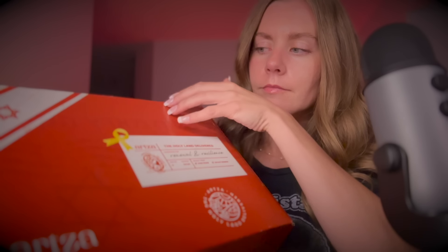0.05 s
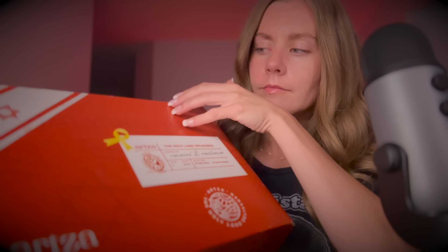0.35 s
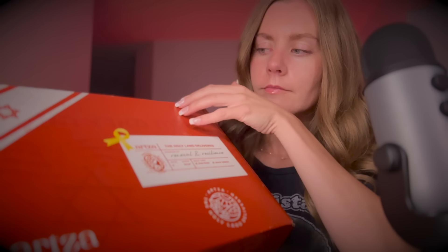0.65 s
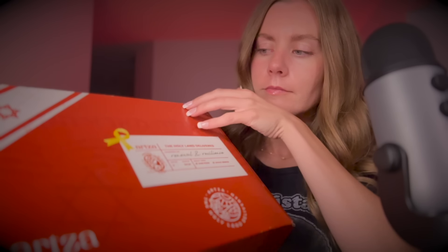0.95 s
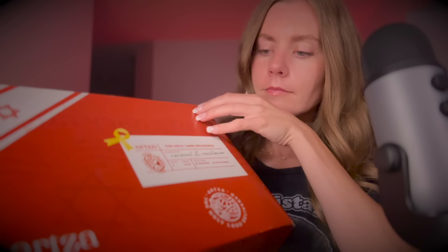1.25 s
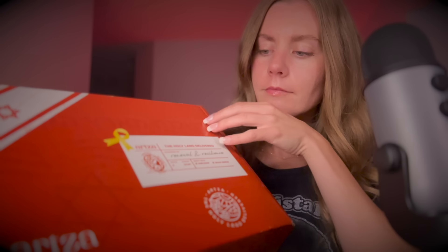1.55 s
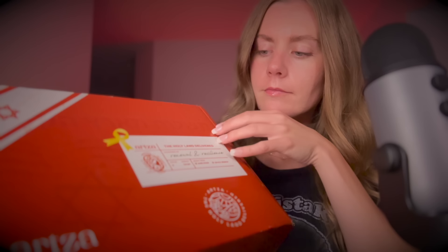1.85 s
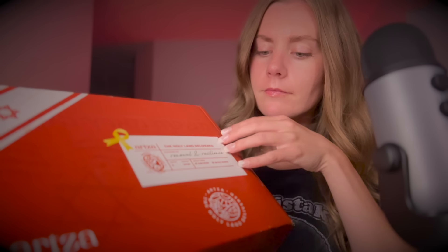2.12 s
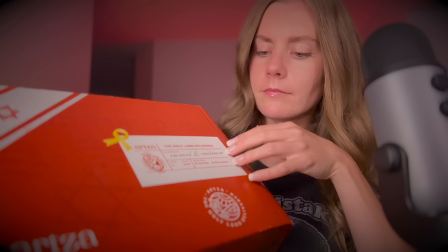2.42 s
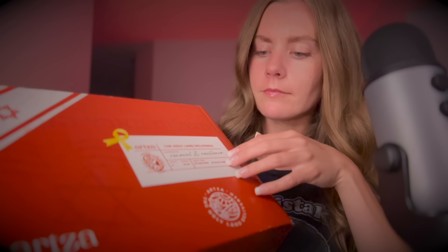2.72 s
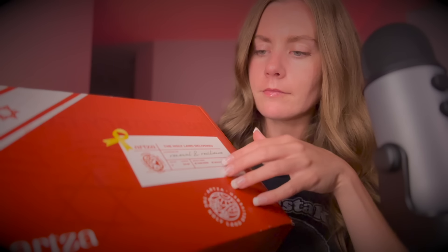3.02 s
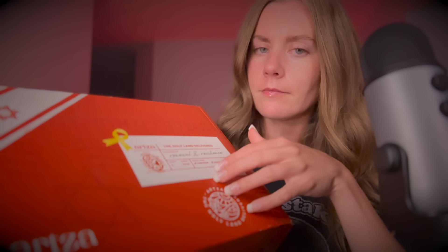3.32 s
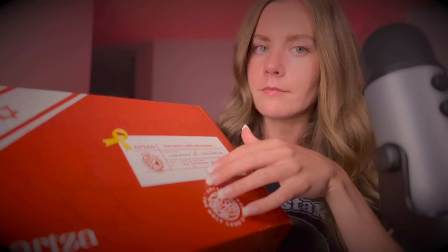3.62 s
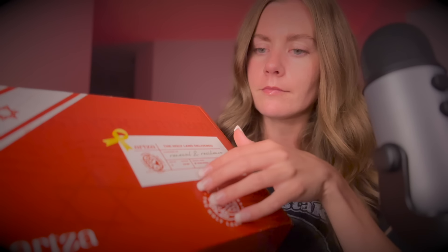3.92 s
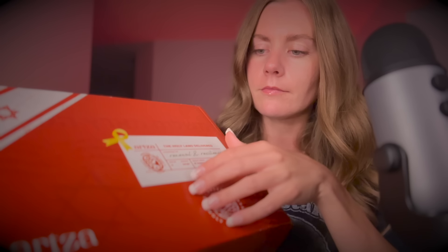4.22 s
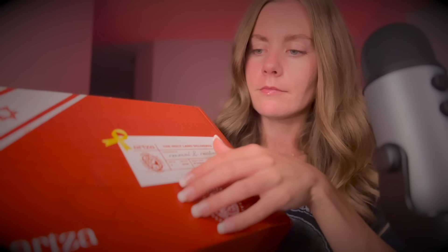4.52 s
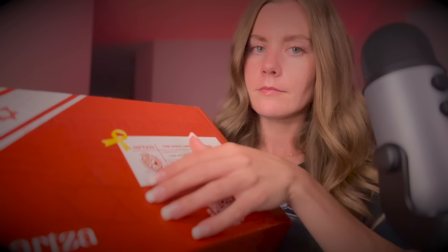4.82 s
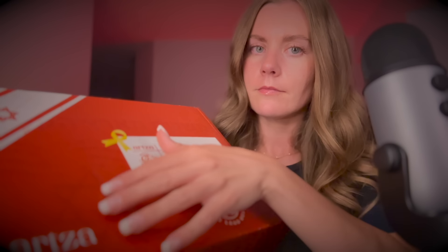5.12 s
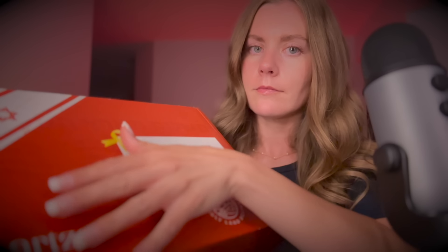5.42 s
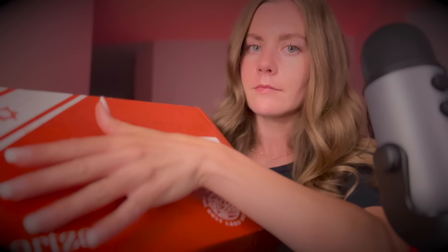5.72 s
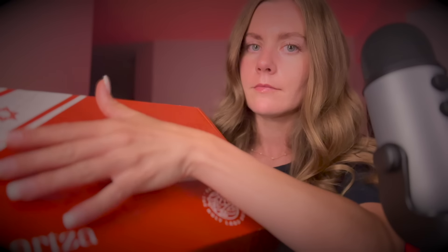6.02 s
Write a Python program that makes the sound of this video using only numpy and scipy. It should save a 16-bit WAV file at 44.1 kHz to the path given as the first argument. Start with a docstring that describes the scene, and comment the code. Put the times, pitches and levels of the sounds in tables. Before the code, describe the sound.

Quick, sharp nail taps and light scratches on a cardboard box in a quiet room, ending in soft rubbing and dull fingertip thumps.

```python
"""In a quiet room, long fingernails tap quickly on a cardboard box beside a microphone.
Each impact excites the box's damped modes, and the nail slides a little after landing, driving them by
stick-slip friction. The fingers work from the stiff edge, which clacks, onto the hollow lid, which
knocks; then the flat hand strokes the lid and soft fingertips bump it. The house drones faintly
underneath, and the hardest taps clip at full scale."""
import sys
import numpy as np
from scipy import signal
from scipy.fft import rfft, irfft, next_fast_len
from scipy.io import wavfile
from scipy.ndimage import map_coordinates

SR = 44100
rng = np.random.default_rng(int(sys.argv[2]) if len(sys.argv) > 2 else 0)


def digitize_waveform(pressure):
    """Quantize a signal to 16-bit integers and store it at the path in sys.argv[1].

    Rows of a 2-D input are taken as channels; values are limited to [-1, 1].
    """
    field = np.atleast_2d(pressure).T
    bounded = np.clip(field, -1, 1)
    quanta = np.round(bounded * 32767).astype(np.int16)
    wavfile.write(sys.argv[1], SR, quanta)


N = 276066
FILTER_SIZE = 8192
FILTER_HZ = np.fft.rfftfreq(FILTER_SIZE, 1 / SR)


def amp(db):
    """Amplitude ratio: tenfold for every 20 dB."""
    return 10 ** (np.asarray(db) / 20)


def unit_rms(x):
    """Normalisation to an rms of 1."""
    return x / np.sqrt(np.mean(x ** 2) + 1e-20)


def curve_at(points, hz):
    """Interpolation of (frequency, value) points on a logarithmic frequency axis."""
    f, values = np.transpose(points)
    return np.interp(np.log(hz + 1), np.log(f + 1), values)


def add(track, s, x):
    """Superposition: x joins the track at s seconds."""
    start = max(round(s * SR), 0)
    part = track[start:start + len(x)]
    part += x[:len(part)]


def wobble(rate, count):
    """Smooth random modulation: a spline through rate random knots a second."""
    knots = rng.standard_normal(int(count * rate / SR) + 4)
    return map_coordinates(knots, [np.arange(count) * rate / SR])


def coloured(x, gain_db):
    """Minimum-phase filtering, with gains given on FILTER_HZ: causality keeps attacks sharp."""
    cepstrum = irfft(np.log(amp(gain_db) + 1e-6))
    cepstrum[1:FILTER_SIZE // 2] *= 2
    cepstrum[FILTER_SIZE // 2 + 1:] = 0
    return signal.fftconvolve(x, irfft(np.exp(rfft(cepstrum))))[:len(x)]


# The room at rest. Each row: frequency in Hz, relative spectral density in dB.
FLOOR_SPECTRUM = [(20, -14), (31, -11), (40, -11), (48, -10), (60, -1.5), (85, -7), (120, -8), (175, -9.5),
                  (300, -16.5), (480, -18), (2500, -30), (6500, -34), (13000, -35), (16000, -38)]
# The drone in the house. Each row: frequency in Hz, rms level in dB about which it wavers.
DRONE_TONES = [(40.2, -46.5), (55, -51.5)]


def background(floor_db=-46, waver_db=4.0, drift_rad=0.55):
    """Noise floor: rumble and microphone hiss, with a house drone modulated in amplitude and phase."""
    hz, t = np.fft.rfftfreq(N, 1 / SR), np.arange(N) / SR
    spectrum = rfft(rng.standard_normal(N)) * amp(curve_at(FLOOR_SPECTRUM, hz))
    out = amp(floor_db) * unit_rms(irfft(spectrum, N))
    for drone_hz, db in DRONE_TONES:
        level = amp(db + waver_db * wobble(3.34, N))
        phase = 2 * np.pi * drone_hz * t + drift_rad * wobble(3.78, N)
        out += level * unit_rms(np.sin(phase))
    return out


# The room's decay. Each row: frequency in Hz, time to fall 60 dB in seconds.
REVERB_TIMES = [(100, 0.52), (500, 0.28), (2000, 0.27), (12000, 0.081)]


def reverberation(x):
    """Absorption in a small furnished room: the diffuse tail decays exponentially, treble first."""
    hz, t, spectra = signal.stft(rng.standard_normal(SR // 2), SR, nperseg=256)
    decay = amp(-60 * t / curve_at(REVERB_TIMES, hz)[:, None])
    tail = signal.istft(spectra * decay, SR, nperseg=256)[1]
    delayed_tail = np.pad(tail / np.linalg.norm(tail), (SR // 150, 0))
    return signal.fftconvolve(x, delayed_tail)[:N]


# The hand's path. Each row: time in seconds, position from 0 (edge) to 1 (lid).
HAND_PATH = [(0, 0.42), (1.3, 0), (2.3, 0.036), (2.6, 0.45), (2.95, 0.7), (3.25, 0.75), (6.26, 1)]


def lid_share(s):
    """Driving point at time s, which decides how strongly each mode is excited."""
    return np.interp(s, *np.transpose(HAND_PATH))


# The hand opens. Each row: time in seconds, pose from 0 (on the nail tips) to 1 (lying flat).
HAND_POSE = [(4.6, 0.016), (5.05, 0.99)]


def flatness(s):
    """Contact geometry at time s: how flat the hand lies."""
    return np.interp(s, *np.transpose(HAND_POSE))


# The box's modes. Each row: frequency in Hz, bandwidth in Hz, relative level in dB when struck at
# the edge, and when struck on the lid.
BOX_MODES = [(59.7, 29, 3, -2.5), (151, 49, -7, -2), (177.5, 50, -6.5, -6), (350, 38, -10.5, -15.5),
             (421.3, 94, -1, 0.5), (488, 70, -4, -2), (584, 68, -2.5, -14.5), (859, 90, -2, -11.5),
             (976, 72, -17.5, -3.5), (1185, 85, 0.5, -9), (1402, 146, -12, -6), (1640, 152, -6.5, -0.5),
             (1844, 115, -8.5, -5), (2170, 100, -8, -14), (2450, 210, -9.5, -16), (3054, 480, -3, -26),
             (3930, 610, -2.5, -4.5), (4500, 1200, -19, -8)]


def box_response(s, spread_db=4.0, scatter_db=-18.0, scatter_t60=0.025):
    """Modal impulse response at the spot touched at time s: all modes start inward together."""
    hz, width, edge_db, lid_db = np.transpose(BOX_MODES)
    level_draw, shift_draw = rng.standard_normal((2, len(BOX_MODES)))
    gain = width * amp(edge_db + lid_share(s) * (lid_db - edge_db) + spread_db * level_draw)
    loaded_hz = hz + width * shift_draw / 5  # the finger's load nudges each mode
    t = np.arange(FILTER_SIZE // 4) / SR
    modes = np.exp(-np.pi * width[:, None] * t) * np.cos(2 * np.pi * loaded_hz[:, None] * t)
    # short bending waves scatter among the flutes of the board
    scatter = signal.lfilter(*signal.butter(1, [1500, 5000], "band", fs=SR), rng.standard_normal(len(t)))
    return -gain @ modes / gain.sum() + amp(scatter_db - 60 * t / scatter_t60) * unit_rms(scatter)


# The nail sings lower as the fingers lean over. Each row: time in seconds, resonance in Hz.
NAIL_PITCH = [(0, 12400), (0.47, 12000), (0.8, 11000), (1.2, 10700), (1.3, 8400), (1.45, 9600), (1.7, 9150),
              (1.83, 7900), (2.0, 11200), (2.55, 11000), (2.87, 8100), (3.9, 8260), (4.3, 9800),
              (4.45, 7900), (4.6, 10200), (4.8, 8900), (6.26, 9500)]
# A long free edge sings lower and more sharply. Each row: resonance in Hz, peak in dB before damping.
NAIL_PEAKS = [(7900, 8.5), (9000, 5), (10300, 3), (13000, 3)]


def nail_resonance_db(s, width_octaves=0.14, dip_db=4, dip_ratio=0.63, flat_damping=0.45):
    """Resonance of the free nail edge: a narrow peak with a dip below, weaker when the hand lies flat."""
    def bell(centre_hz):
        return np.exp(-.5 * (np.log2((FILTER_HZ + 1) / centre_hz) / width_octaves) ** 2)

    hz = np.interp(s, *np.transpose(NAIL_PITCH))
    on_tips = 1 - flat_damping * flatness(s)
    return on_tips * (curve_at(NAIL_PEAKS, hz) * bell(hz) - dip_db * bell(dip_ratio * hz))


# The hollow, board, crack and nail registers. Each row: lower limit in Hz, upper limit in Hz.
REGISTERS = [(100, 650), (850, 2000), (2600, 6000), (7500, 14000)]
CENTRES_HZ = np.sqrt(np.prod(REGISTERS, axis=1))


def register_levels(colours, s, strength_db, tilt_db):
    """Spectral balance in dB: spot and pose set the colour, and the contact tilts it about 1 kHz."""
    lid = lid_share(s)
    shares = [1 - lid, lid, flatness(s)]
    colour_db = np.dot(shares, [colours["edge"], colours["lid"], colours["flat hand"]])
    return strength_db + colour_db + tilt_db * np.log2(CENTRES_HZ / 1000)


def voiced(x, levels_db, seconds):
    """Equalisation for a finger's force and angle: each register's energy / seconds nears its level."""
    size = next_fast_len(len(x))
    hz = np.fft.rfftfreq(size, 1 / SR)
    power = 2 * abs(rfft(x, size)) ** 2 / (size * seconds * SR)
    gains_db = np.zeros(len(REGISTERS))
    for _ in range(3):
        shaped = power * amp(curve_at(np.column_stack([CENTRES_HZ, gains_db]), hz)) ** 2
        band_power = [shaped[(hz > low) & (hz < high)].sum() + 1e-20 for low, high in REGISTERS]
        gains_db = gains_db + levels_db - 10 * np.log10(band_power)
    return coloured(x, curve_at(np.column_stack([CENTRES_HZ, gains_db]), FILTER_HZ))


# The flexing lid and the air under it. Each row: frequency in Hz, relative level in dB, time to
# fall 60 dB in seconds.
LID_MODES = [(56.2, -1.5, 0.25), (147.6, 3.5, 0.14), (192.3, -3.5, 0.12), (236, -5.5, 0.093)]
# Soft pushes on the lid. Each row: start in seconds, peak level in dB.
BUMPS = [(4.775, -37), (4.877, -26.5), (4.987, -18), (5.127, -33), (5.301, -28), (5.55, -24), (5.613, -27),
         (5.789, -24.5), (5.848, -21), (5.93, -30), (6.075, -18), (6.184, -22), (6.224, -21)]


def fingertip_bumps(attack_s=0.0029, detune=0.06):
    """Compliant impact: flesh is too soft to excite the high modes, so only the whole lid flexes."""
    out, t = np.zeros(N), np.arange(SR // 2) / SR
    for s, peak_db in BUMPS:
        thud = sum(amp(db - 60 * t / t60) * np.sin(2 * np.pi * hz * rng.normal(1, detune) * t)
                   for hz, db, t60 in LID_MODES)
        thud *= 1 - np.exp(-t / attack_s)
        add(out, s, -amp(peak_db) * thud / abs(thud).max())
    return out


def moving_contact(force, start, spot_s=0.045):
    """Time-varying convolution: a sliding finger crosses spots that each answer a little differently."""
    spots = np.arange(len(force)) / SR / spot_s
    out = np.zeros(len(force) + FILTER_SIZE // 2)
    for spot in range(int(spots[-1]) + 2):
        near = np.flatnonzero(abs(spots - spot) < 1)
        if len(near):
            crossfade = np.cos(np.pi / 2 * (spots[near] - spot))
            add(out, near[0] / SR, signal.fftconvolve(force[near] * crossfade, box_response(start)))
    return out


# Friction on paper. Each row: frequency in Hz, relative gain in dB.
FRICTION_SPECTRUM = [(30, -29.5), (130, -13.5), (400, -8), (1700, -7), (3000, 1.5), (5000, -0.5), (6700, 0),
                     (9000, 2), (13000, 3.5), (16000, -1)]
# A slide's colour by spot or pose. Each entry: hollow, board, crack and nail weights in dB.
SLIDE_COLOURS = {"edge": (1, 0.5, -9, -8), "lid": (11.5, -0.5, -15.5, -21),
                 "flat hand": (-13, 2, 16.5, 23.5)}
# A nail or the hand slides. Each row: start in seconds, end in seconds, relative strength in dB,
# lightness as treble tilt in dB per octave.
SLIDE_STROKES = [(0.0, 0.076, -45.5, 0.5), (0.226, 0.375, -49.5, -0.3), (0.467, 0.57, -45.5, -0.8),
                 (0.578, 0.675, -43, 0), (0.781, 0.865, -44, 0.5), (0.863, 0.95, -44, 2),
                 (1.035, 1.113, -46.5, 0.2), (1.116, 1.158, -40, 1), (1.165, 1.221, -38.5, 1.5),
                 (1.222, 1.261, -46.5, 2), (1.28, 1.44, -42, 0.2), (1.439, 1.548, -40.5, 1.7),
                 (1.563, 1.642, -54, 2.9), (1.673, 1.732, -40, -1.8), (1.722, 1.84, -41.5, 1.8),
                 (1.83, 1.882, -43.5, 2), (1.939, 2.073, -46, -0.5), (2.07, 2.195, -34.5, -1.1),
                 (2.188, 2.337, -38, -1.4), (2.358, 2.474, -37, -1), (2.526, 2.704, -40.5, 0),
                 (2.864, 2.935, -41, 0.1), (2.946, 3.036, -34.5, -0.5), (3.098, 3.26, -47, -0.4),
                 (3.266, 3.341, -40, -0.3), (3.37, 3.433, -39, -0.9), (3.435, 3.543, -48, 1),
                 (3.584, 3.658, -39, -0.2), (3.689, 3.745, -36.5, -1.5), (3.783, 3.89, -46, 0.4),
                 (3.891, 3.944, -38.0, 0), (4.013, 4.113, -46, -0.5), (4.234, 4.314, -36.5, 0.6),
                 (4.367, 4.462, -41.5, 0.2), (4.506, 4.59, -37.5, 0.3), (4.624, 4.692, -38.0, -1.1),
                 (4.743, 4.823, -38, 0.8), (4.825, 4.897, -49, 2.5), (4.887, 4.98, -45.5, 2.2),
                 (4.991, 5.057, -39.5, -1.85), (5.122, 5.151, -51, -0.5), (5.275, 5.385, -48.5, 0.54),
                 (5.393, 5.55, -56.5, -0.1), (5.505, 5.605, -44, -0.3), (5.606, 5.662, -47, 0),
                 (5.665, 5.746, -56, 1.2), (5.785, 5.992, -56, -0.8)]


def slides(friction_db=-0.4, slips_per_s=600, flat_extra_per_s=1500, slip_spread_db=4.5, catch_hz=4200,
           hiss=0.72, uneven_db=0.64, rise_s=0.0029, fall_s=0.0081, flat_swell=0.46):
    """Stick-slip friction: tiny slips on the paper drive the box's modes, finer under the flat hand."""
    out = np.zeros(N)
    for start, end, strength_db, tilt_db in SLIDE_STROKES:
        length, flat = end - start, flatness(start)
        span = length + fall_s
        count = int(span * SR)
        t = np.arange(count) / SR
        caught = rng.random(count) < (slips_per_s + flat * flat_extra_per_s) / SR
        slips = caught * rng.choice([-1, 1], count) * amp(slip_spread_db * rng.standard_normal(count))
        # a nail presses at once, while the flat hand swells and fades
        pressure = np.clip(t / rise_s, 0, 1) * np.clip((span - t) / (2 * fall_s), 0, 1)
        pressure *= amp(uneven_db * wobble(73.3, count))
        pressure *= 1 - flat_swell * flat * (1 - np.sin(np.pi * t / span))
        # single slips are heard in the board; in the treble they merge into a smooth hiss
        catches = signal.lfilter(*signal.butter(1, catch_hz, fs=SR), slips)
        force = pressure * (unit_rms(catches) + hiss * rng.standard_normal(count))
        contact_db = curve_at(FRICTION_SPECTRUM, FILTER_HZ) + nail_resonance_db(start)
        rub = coloured(moving_contact(force, start), contact_db)
        levels_db = register_levels(SLIDE_COLOURS, start, strength_db, tilt_db)
        add(out, start, amp(friction_db) * voiced(rub, levels_db, length))
    return out


# A nail's blow. Each row: frequency in Hz, relative gain in dB.
IMPACT_SPECTRUM = [(30, -15.5), (120, 6), (1700, 2), (3000, 4.5), (5000, 0), (6800, -2), (9000, 3.5),
                   (12000, 2), (16000, -3)]
# A tap's colour by spot or pose. Each entry: hollow, board, crack and nail weights in dB.
TAP_COLOURS = {"edge": (-2, 0.5, -10.5, -14.5), "lid": (11.5, 0, -15, -22),
               "flat hand": (-10.5, 0.5, 6.5, 12.5)}
# A finger lands. Each row: start in seconds, relative strength in dB, hardness as treble tilt in
# dB per octave, thump of the finger's weight in dB.
LANDINGS = [(0.114, -39.5, -3.5, -2.5), (0.219, -20, -0.16, -1.5), (0.2545, -19.5, -0.9, -5.0),
            (0.301, -30.5, -0.8, -12.0), (0.4256, -35, 1.2, 3.5), (0.4612, -19, -0.46, -1),
            (0.5676, -15.5, -2.5, -9.5), (0.6121, -20, 0.2, -7.5), (0.6907, -43.5, 2.5, 16),
            (0.7723, -12, -1.3, -3.5), (0.8117, -24.5, -3, -9), (0.8614, -24.0, -0.5, -14),
            (1.0292, -18.5, 0.5, 0.5), (1.1136, -18.5, -2.0, -6.5), (1.162, -19.5, -1.5, -11.5),
            (1.2462, -32, -5, -15), (1.2745, -21.5, 1.3, -1), (1.3216, -19.0, 1.0, 3),
            (1.4337, -20.5, 1.0, 3.5), (1.4862, -21.5, 1.5, 5.5), (1.5627, -34, 4, 17),
            (1.6659, -20.5, -0.5, -2), (1.7224, -22.5, 0.3, 0.5), (1.7714, -21, -0.0, 4),
            (1.871, -36, 2.0, 13), (1.9371, -21, 0.5, 2.0), (2.0864, -24, -2, 1.0), (2.1219, -28.5, 0.5, 1),
            (2.2072, -40, 3.5, 2), (2.3181, -28.5, -1.3, -11), (2.3537, -21.0, 0.3, 4.5),
            (2.4056, -27, -1, -2.0), (2.5222, -23.5, 1.3, 5), (2.662, -21, -0.9, 0),
            (2.8625, -22.5, 1.0, -2), (2.9424, -16.5, 0, -0.5), (2.9863, -16, -2, -8.5),
            (3.023, -29, 0.1, 1), (3.0875, -33.5, 0.3, 4.5), (3.137, -20.5, -3, -16),
            (3.253, -19.5, -0.4, 1.5), (3.2742, -44.5, 0.5, 13.5), (3.367, -26.5, -1.3, 0.5),
            (3.4255, -29.5, -3.5, -11), (3.5421, -20.5, 1.16, 6), (3.5825, -21.0, -1, -2.5),
            (3.6817, -23.5, 0.3, 2.5), (3.7722, -22, -0.1, -5), (3.8801, -19, 3, 9),
            (4.0091, -28.5, -0.6, 4.5), (4.0775, -30, 1.3, -2.5), (4.221, -21, 2, 9.0),
            (4.2485, -19, -0.2, -1), (4.3578, -22, -0.2, 1.0), (4.445, -31, 4, 6.5), (4.4964, -21, 1.66, 4),
            (4.617, -19.5, -0.65, -3.5), (4.7406, -28.5, 1, -6), (4.7728, -21.5, -0.7, -5.0),
            (4.9272, -35, 1, 1), (4.9885, -18.5, -4, -13.5), (5.2775, -40.5, -1, 3),
            (5.2997, -34.5, 0.9, 0.5), (5.55, -31.5, -0.8, -0.0), (5.7889, -30.0, 0.4, 5.5),
            (5.8484, -38, 3, 13), (5.9257, -34.5, -0.4, -2.5), (5.9788, -36.0, 0, 1),
            (6.0755, -35.0, 2.1, 8.5), (6.1837, -35, 0, 3), (6.2236, -29, -0.4, 1.5)]


def nail_taps(force_db=-0.7, nail_share=0.64):
    """Impulse excitation: a hard nail tip gives one sharp push, and the box rings briefly."""
    out = np.zeros(N)
    for s, strength_db, tilt_db, thump_db in LANDINGS:
        contact_db = curve_at(IMPACT_SPECTRUM, FILTER_HZ) + nail_share * nail_resonance_db(s)
        blow = coloured(box_response(s), contact_db)
        levels_db = register_levels(TAP_COLOURS, s, strength_db, tilt_db)
        levels_db[0] += thump_db  # the finger's weight reaches only the hollow register
        add(out, s, amp(force_db) * voiced(blow, levels_db, seconds=0.01))
    return out


def scene(room_db=-20):
    """Direct and diffuse fields: a hand's length from the box, the direct sound dominates."""
    direct = nail_taps() + slides() + fingertip_bumps()
    return (direct + amp(room_db) * reverberation(direct) + background())[None]


def record(dry, top_hz=15950, roll_off_hz=500):
    """Clipping and band limiting: a hard tap's first swing flattens, and the top treble is cut."""
    size = next_fast_len(N + FILTER_SIZE)
    hz = np.fft.rfftfreq(size, 1 / SR)
    passband = np.clip((top_hz - hz) / roll_off_hz + .5, 0, 1)
    clipped = np.clip(dry, -1, 1)
    return irfft(rfft(clipped, size) * passband, size)[..., :N]


dry = scene()
out = record(dry)
digitize_waveform(out)
```